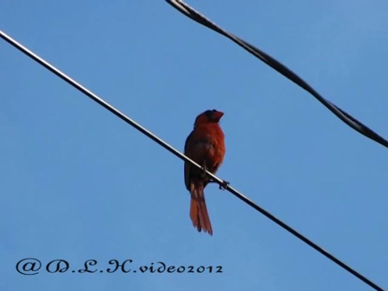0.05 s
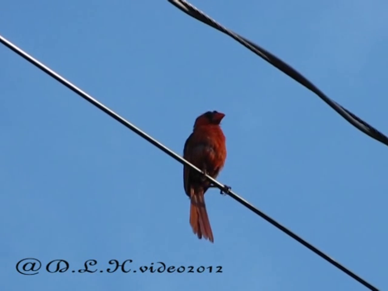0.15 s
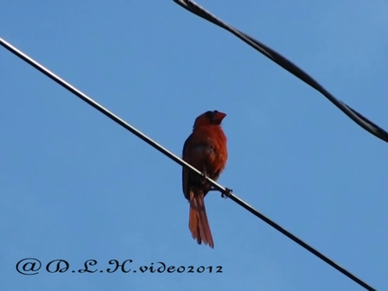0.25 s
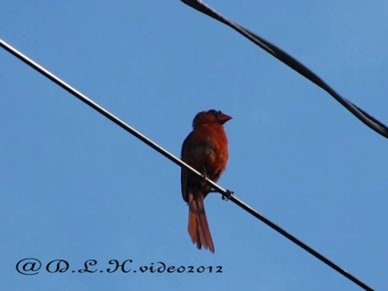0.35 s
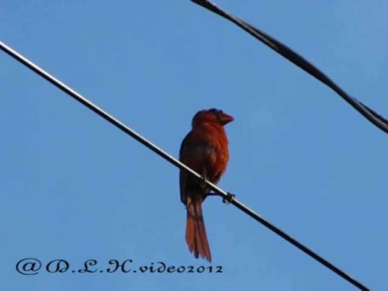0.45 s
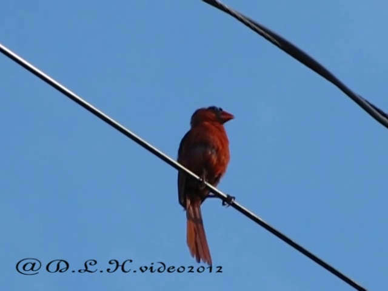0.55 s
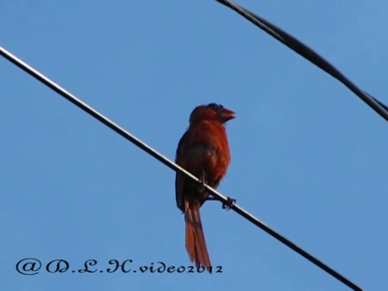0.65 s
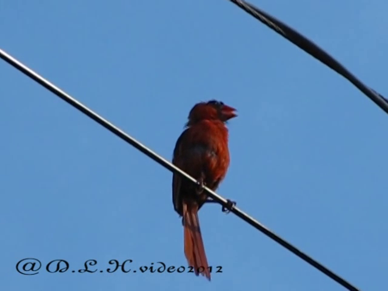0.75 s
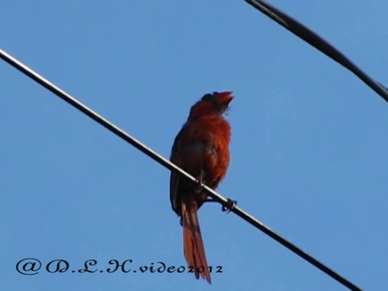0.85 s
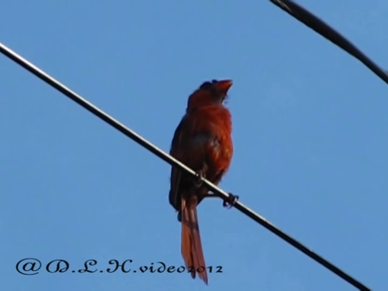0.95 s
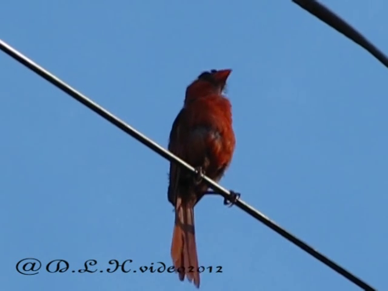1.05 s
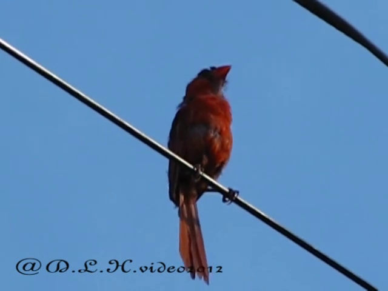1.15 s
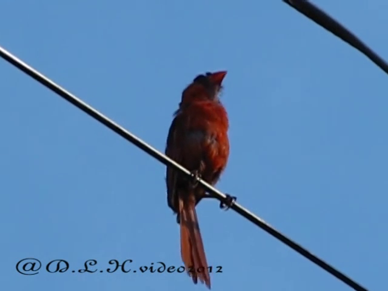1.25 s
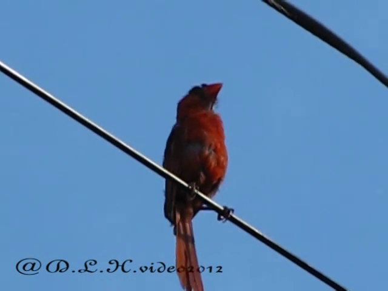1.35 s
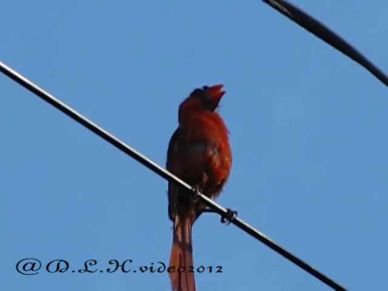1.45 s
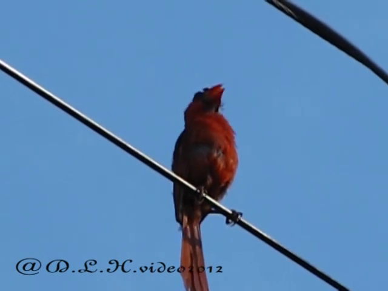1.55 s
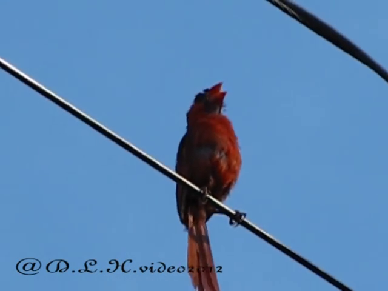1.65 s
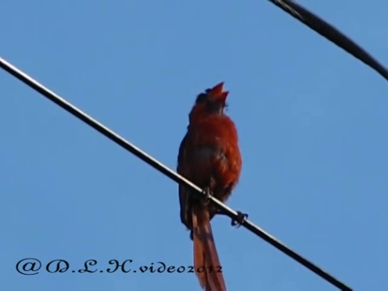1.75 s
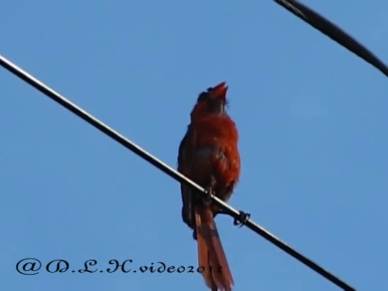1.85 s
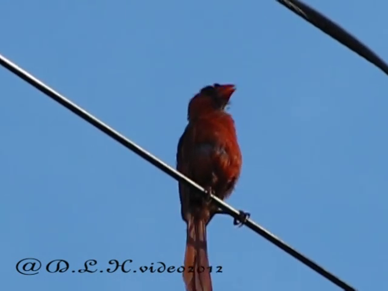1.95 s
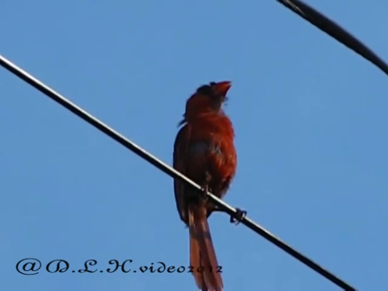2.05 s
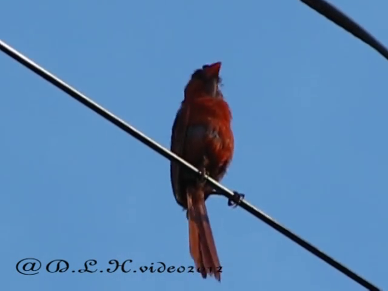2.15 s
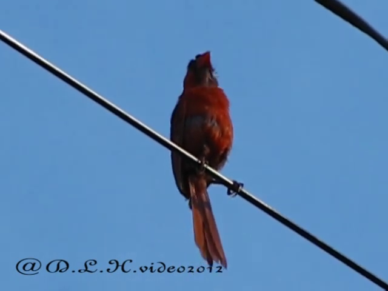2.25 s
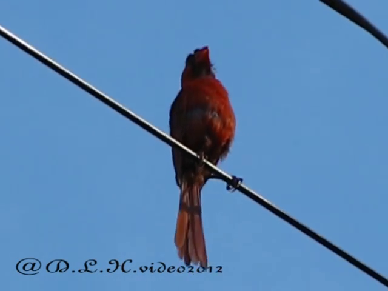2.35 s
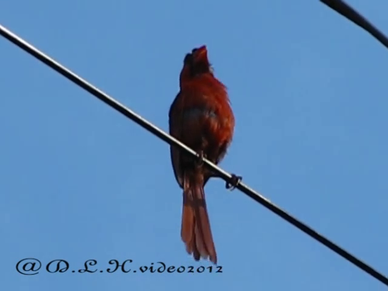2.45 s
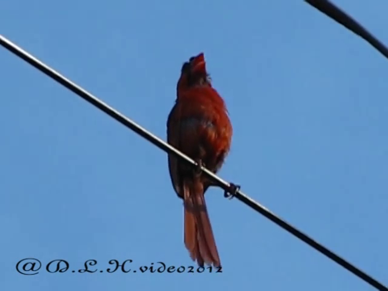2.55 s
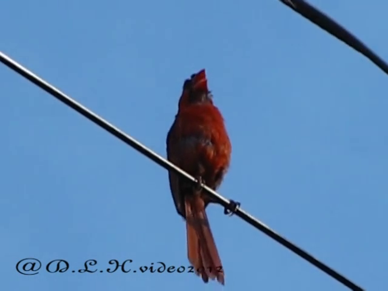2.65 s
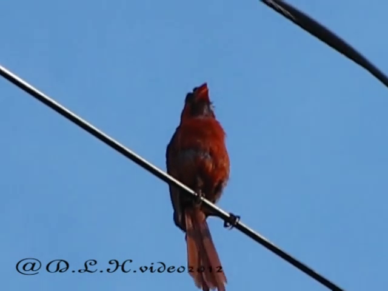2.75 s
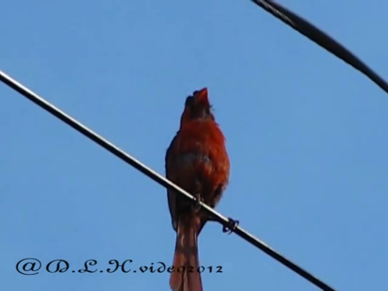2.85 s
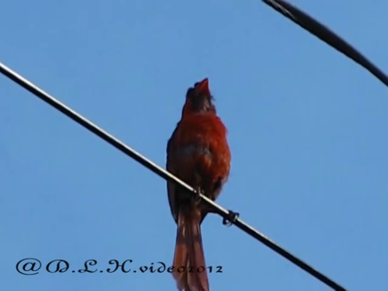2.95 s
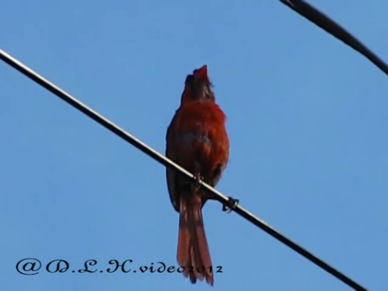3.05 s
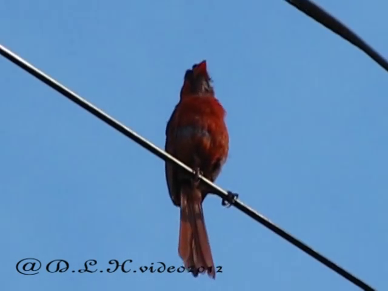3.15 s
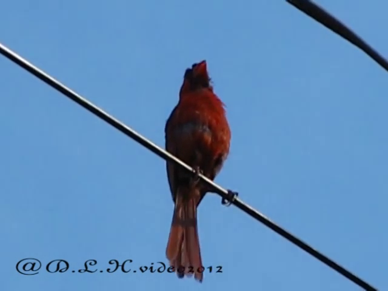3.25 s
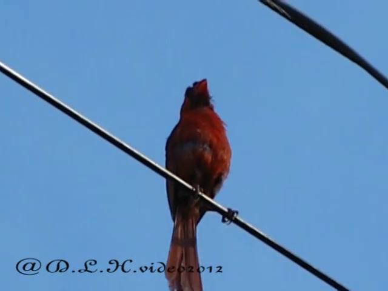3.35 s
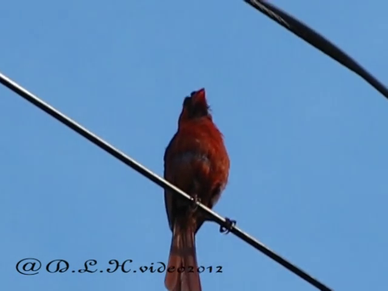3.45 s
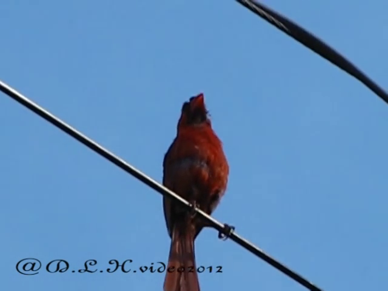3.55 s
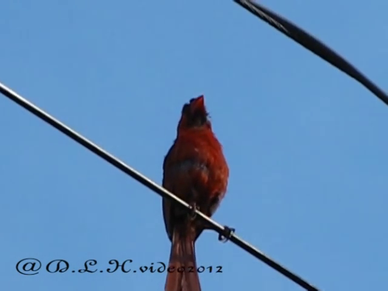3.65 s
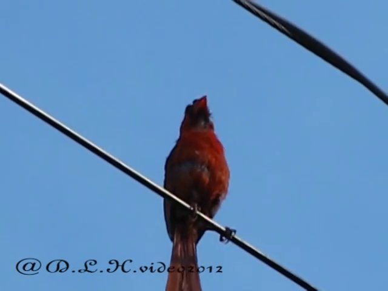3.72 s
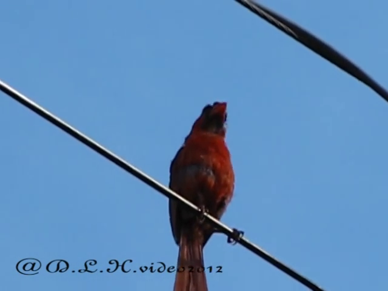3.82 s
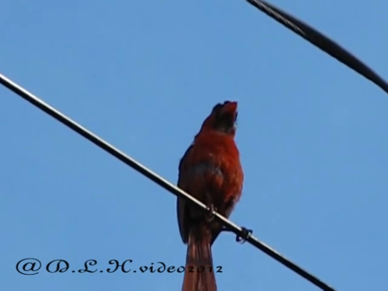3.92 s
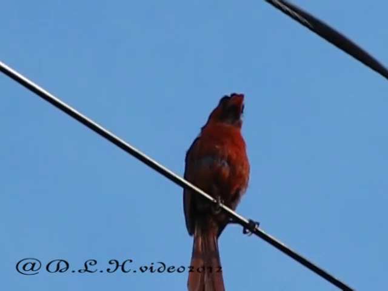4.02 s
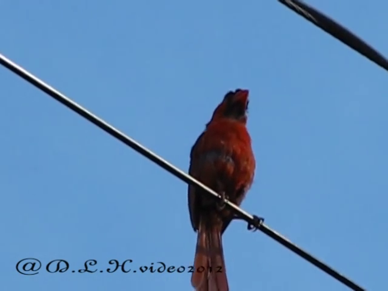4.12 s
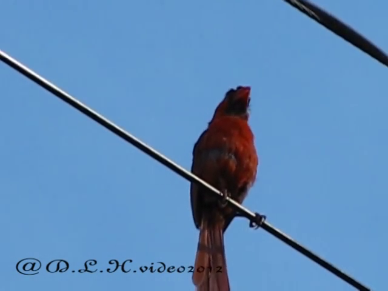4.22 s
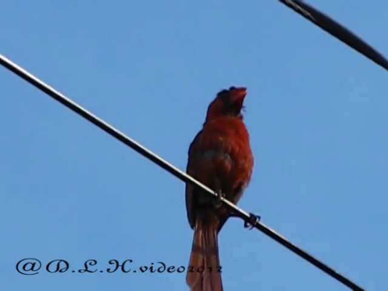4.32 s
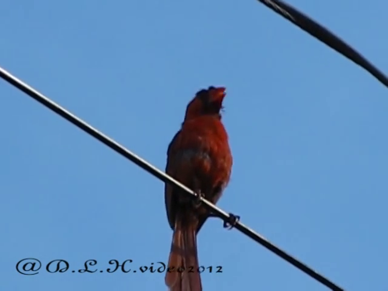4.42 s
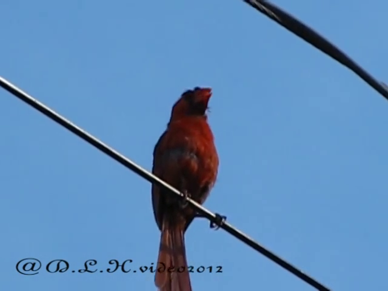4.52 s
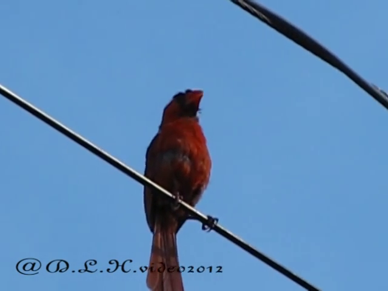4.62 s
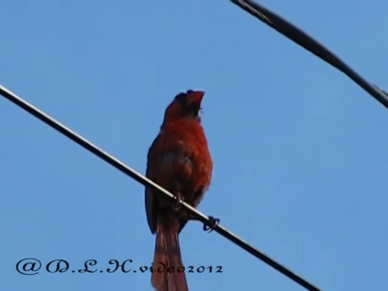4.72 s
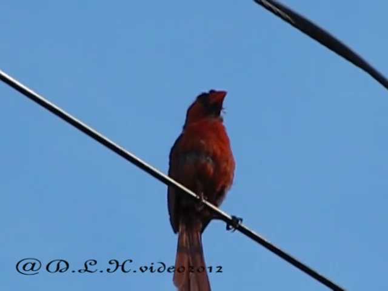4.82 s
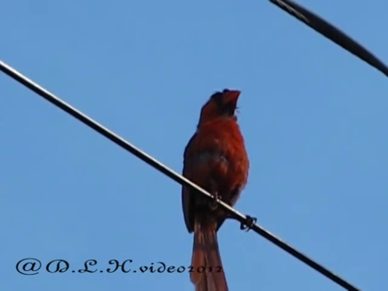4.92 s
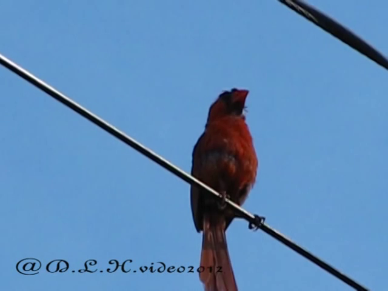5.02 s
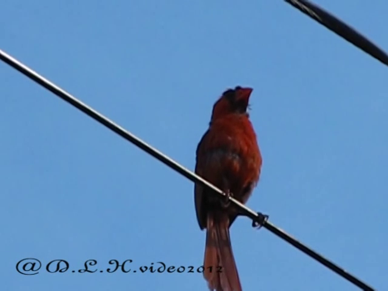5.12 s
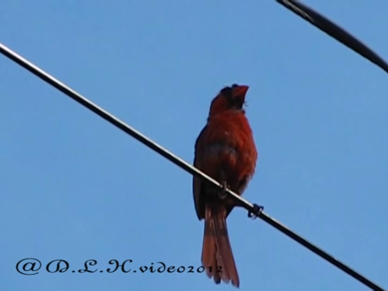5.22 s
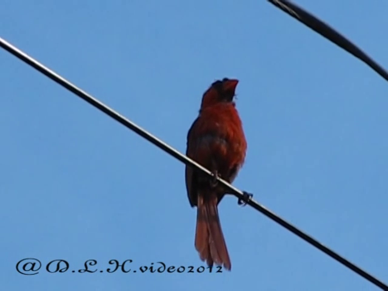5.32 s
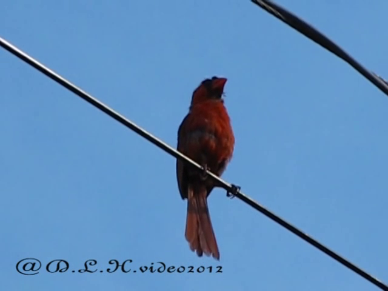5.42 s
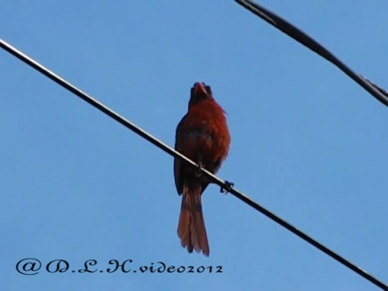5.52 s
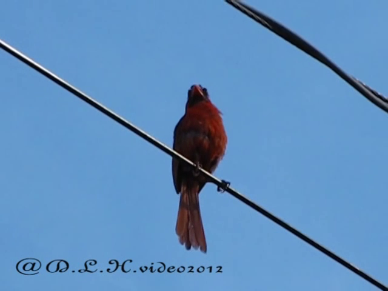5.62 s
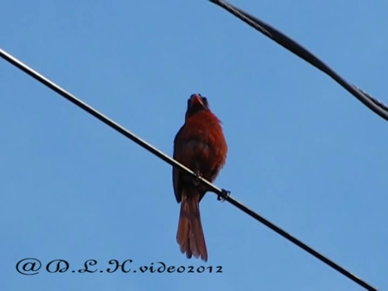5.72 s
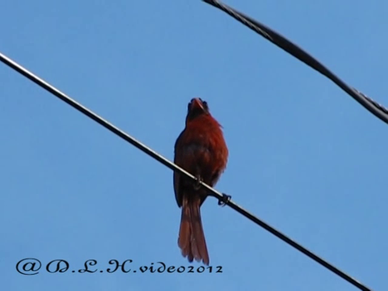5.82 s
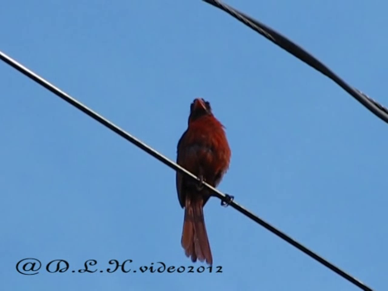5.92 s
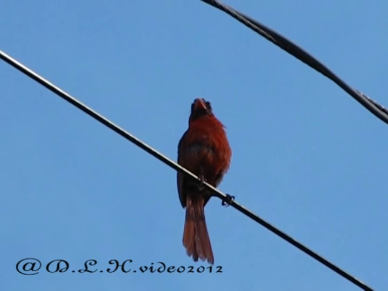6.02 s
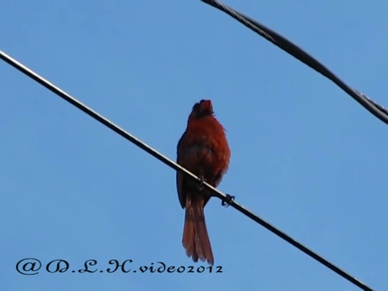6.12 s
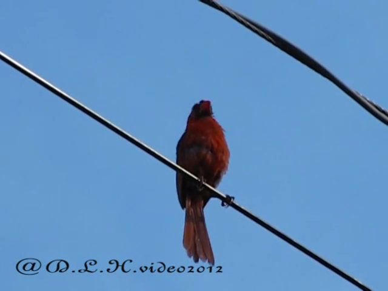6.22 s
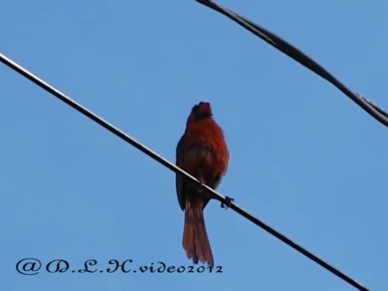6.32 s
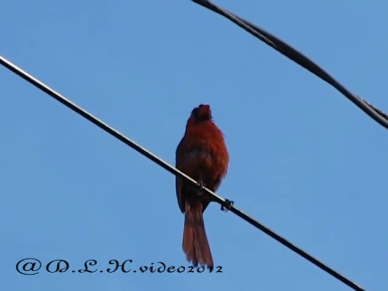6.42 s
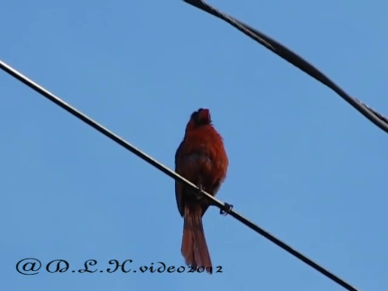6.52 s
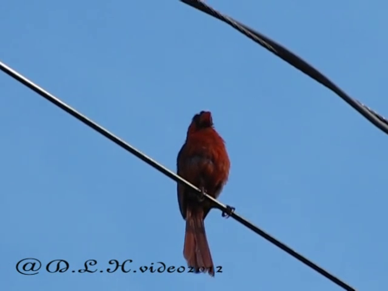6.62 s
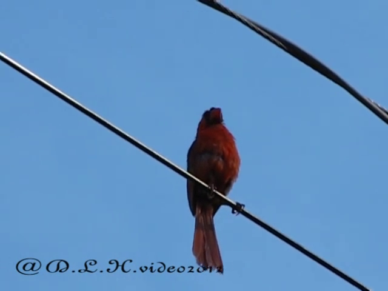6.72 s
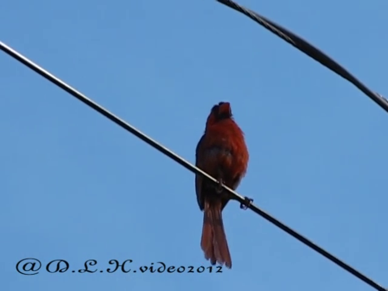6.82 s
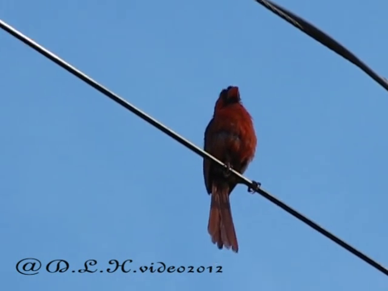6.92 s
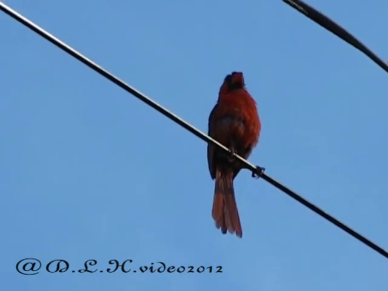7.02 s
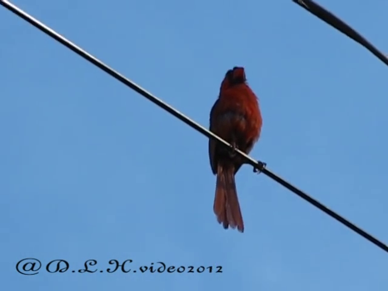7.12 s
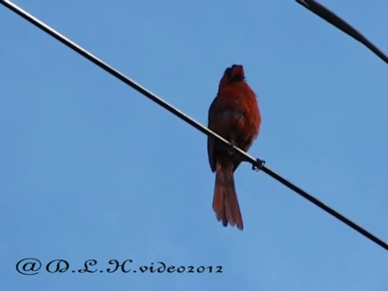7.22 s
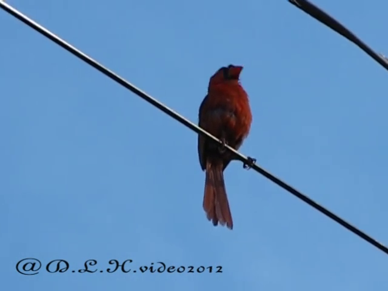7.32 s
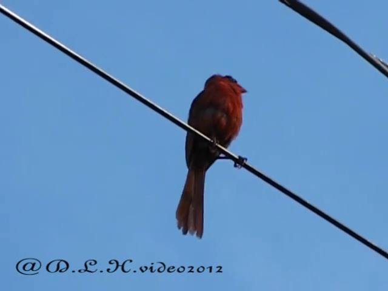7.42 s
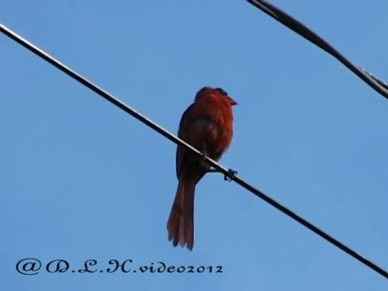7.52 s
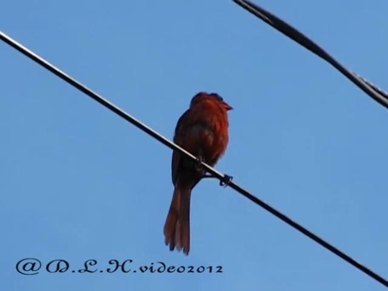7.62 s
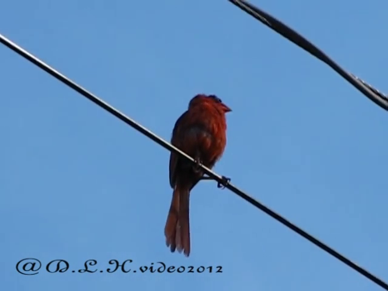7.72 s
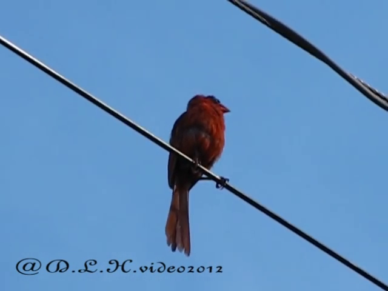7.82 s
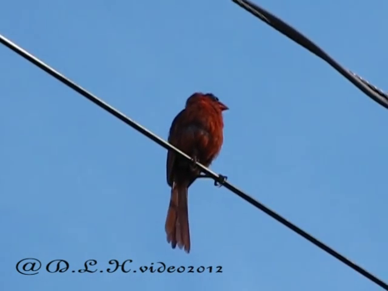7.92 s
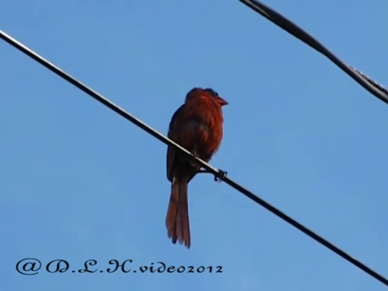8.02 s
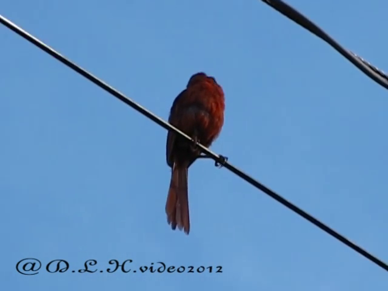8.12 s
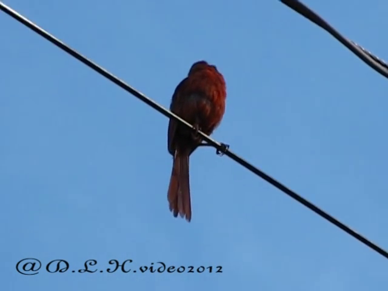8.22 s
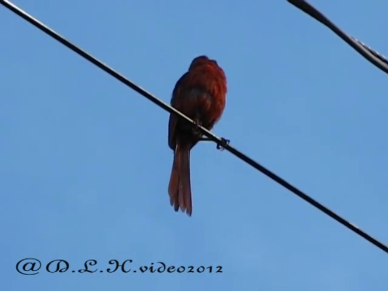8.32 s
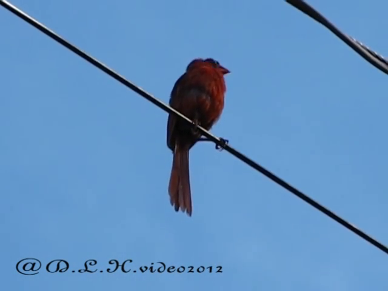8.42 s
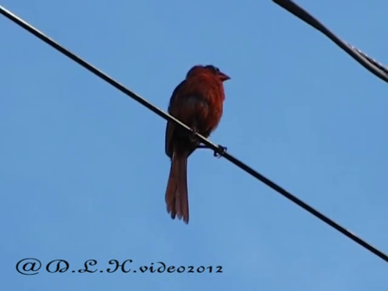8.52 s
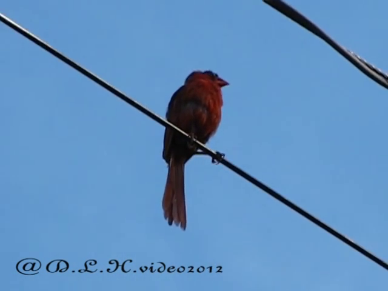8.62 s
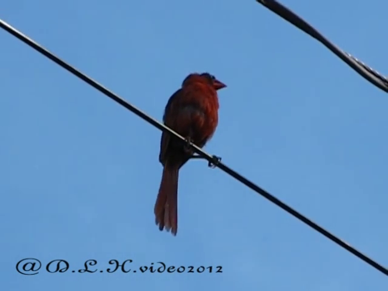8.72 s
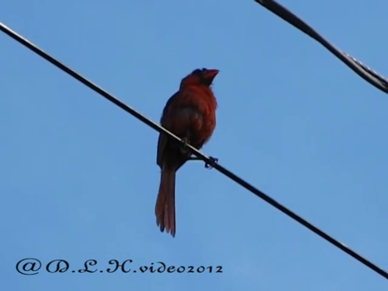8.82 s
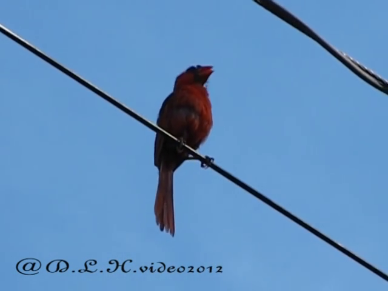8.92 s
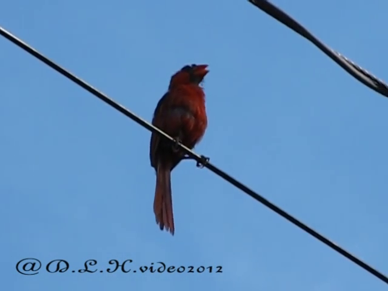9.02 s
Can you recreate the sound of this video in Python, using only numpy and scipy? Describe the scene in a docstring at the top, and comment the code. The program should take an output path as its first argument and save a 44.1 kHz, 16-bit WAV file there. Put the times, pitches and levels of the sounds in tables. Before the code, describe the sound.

Outdoors, a red songbird sings piercing downward whistles, then a quick trill, over throbbing insects, distant birds and a few bumps on the microphone.

```python
"""From the outset two insects throb near 6-7 kHz over distant traffic, crickets chirp and far birds whistle.
From 0.5 s a songbird whistles steep slurs, high then low, in three pairs; from 3.3 s it trills, and near
8.8 s one high slur returns. Knocks on a hand-held camera come near 0.5, 3.5, 5.4 and 8 s. Voices are swept
sines, insects noise ringing in resonances, knocks damped modes and traffic shaped noise. Trees and houses
return decaying echoes, and two microphone ports hear sources with differing phase and level."""
import sys
import numpy as np
from scipy import signal
from scipy.fft import rfft, irfft
from scipy.io import wavfile
from scipy.ndimage import uniform_filter1d

SR = 44100
rng = np.random.default_rng(int(sys.argv[2]) if len(sys.argv) > 2 else 0)


def store_pcm(level_fs):
    """Save levels as 16-bit WAV."""
    pcm = np.round(np.clip(level_fs, -1, 1) * 32767).astype(np.int16)
    wavfile.write(sys.argv[1], SR, np.atleast_2d(pcm).T)


N = 399546  # length [samples]
T = np.arange(N) / SR  # time [s]
HZ = np.maximum(np.fft.rfftfreq(N, 1 / SR), 1)  # frequency of each spectral bin [Hz]
TOP_HZ = 15600  # upper limit of the overtones and of the recorder

# High slurs: (start [s], length [s], level [dB], extra opening level [dB],
# opening pitch [factor], mid-fall pitch [factor])
HIGH_SLURS = [(0.498, .48, -22, -15, .92, 1.035), (1.503, 0.43, -19.5, 1.5, 0.93, 1.004),
              (2.427, 0.43, -21.5, 1.5, 1.027, .995), (8.782, 0.45, -20, -15.5, 1.03, 1.046)]
# Their common contour: (share of the length [1], pitch [Hz], level [dB]); a faint tone trails after share 1
HIGH_CONTOUR = [(0, 8860, -10), (.012, 7900, -7.5), (.04, 6796, 4), (.083, 5710, 9.5), (.138, 5090, -2.5),
                (.207, 4683, -3), (.29, 4100, -2.5), (.38, 3820, -2), (0.483, 3420, 1), (.595, 3145, 3),
                (.72, 2816, 1.5), (0.857, 2453, 3), (1.001, 2316, -2.5), (1.01, 2264, -32),
                (1.22, 2400, -57)]
OPENING_DB_SHARE, OPENING_PITCH_SHARE = 0.49, 0.093  # reach of the opening changes [share of the length]
# Low slurs: (start [s], length [s], first pitch [Hz], last pitch [Hz], level [dB],
# level change over the slur [dB])
LOW_SLURS = [(1.099, 0.26, 2090, 1713, -32.5, 6), (2.034, 0.27, 2112, 1588, -29, -2.5),
             (2.955, .282, 2072, 1560, -28.5, -7)]
# Their common contour: (share of the length [1], share of the fall in pitch [1], level [dB])
LOW_CONTOUR = [(0, 0.088, -15), (0.041, 0.01, 1.5), (.25, .22, 2), (.5, .58, -1.5), (.7, .78, -3),
               (.9, 0.91, -2), (1.0, 0.68, -33)]
# Trill note, a hook up and a plunge: (time from the plunge [s], pitch [Hz], level [dB])
TRILL_CONTOUR = [(-.013, 5830, -13), (-.007, 7125, -7), (-.004, 7050, -11), (-.001, 5780, -3),
                 (.001, 3800, -1), (.004, 2530, -2), (.007, 2046, -14.5), (.014, 1793, -7),
                 (.029, 1330, -18), (.033, 1300, -16)]
# Trill notes: (time of the plunge [s], level [dB], hook pitch [factor])
TRILL_NOTES = [(3.3235, -25, 0.97), (3.424, -27, 1.0), (3.5256, -22, 0.99), (3.63, -24, 0.97),
               (3.7356, -23.5, 1.01), (3.841, -22.5, 1.04), (3.9455, -21.5, 0.96), (4.0501, -22, 0.98),
               (4.1568, -23, 0.99), (4.2622, -22.5, 1), (4.367, -21, 1.04), (4.476, -21.5, 1.01),
               (4.581, -21, 1.04), (4.6907, -22.5, 0.98)]
# Overtones: (multiple of the pitch [1], level in high slurs [dB], in low slurs [dB], in the trill [dB])
VOICE_OVERTONES = [(2, -25.5, -27, -18.5), (3, -31.5, -46, -38), (4, -30.5, -13.5, -33),
                   (5, -30.5, -29, -45), (6, -48, -23.5, -30), (7, -52, -38, -31), (8, -52, -38, -46)]
# Throat and beak resonance acting on the overtones: (frequency [Hz], gain [dB])
BEAK_GAIN = [(2000, 21.5), (6500, -16), (7600, 4.5), (9000, 0), (12000, -4), (14000, -14), (16000, -24)]
# Songbird at the two ports: (frequency [Hz], left minus right level [dB], phase lead of the left [rad])
BIRD_AT_PORTS = [(300, -6, 6), (1840, 0, 1.3), (2800, -3, -1.4), (3800, 5, 1.47), (4500, 4, -2),
                 (5000, 7.5, -2.5), (6230, -6, -5), (7180, -2, -5), (7900, 10.5, -8.5), (8470, -1, -8.5),
                 (10500, 4.5, -8.5), (11800, 0, -10.5)]
# Echo of trees and houses: (frequency [Hz], level [dB], time to decay by 60 dB [s])
ECHO_BANDS = [(1450, -3.5, 0.52), (2400, -5.5, 0.65), (3100, 1, 0.52), (4500, -5, 0.53), (6100, -7.5, 0.25),
              (10300, -5.5, 0.31)]

# Camera knocks: (time [s], level [dB], ring [Hz], time to decay by 60 dB [s],
# left minus right level [dB], click level [dB])
KNOCK_EVENTS = [(.434, -27.5, 373, 0.011, 14, 3), (0.477, -36, 1674, .05, -6, -4),
                (0.622, -26, 1130, 0.033, 7, 15), (3.369, -12, 743, 0.013, -8, 6.5),
                (3.408, -19, 706, 0.015, -7, 0), (3.478, -16.5, 705, 0.01, -6, -12),
                (3.619, -17, 743, 0.014, -6.5, -1), (5.433, -22, 694, 0.017, 7, 3.5),
                (5.472, -33.5, 357, .015, 17, 7), (7.929, -37, 2200, .01, -3, 3),
                (8.099, -31, 2650, .012, 4, 0), (8.229, -39, 2400, .01, -1.0, 9)]
# Modes of the camera housing: (multiple of the ring frequency [1], level [dB])
HOUSING_MODES = [(1.0, -2), (.72, -22), (1.4, -7.5)]

# Near cricket, a lead-in and two strong pulses: (time of the first pulse [s], time to the second [s],
# time since the lead-in [s], pulse level [dB], lead-in level [dB])
NEAR_CHIRPS = [(0.2562, 0.08, .077, -29, -48), (0.8175, 0.083, .07, -28, -55),
               (1.48, 0.074, .076, -28, -46), (2.1273, 0.082, 0.048, -27.5, -44),
               (2.6903, 0.082, .07, -28, -55), (5.3038, 0.087, 0.082, -29.5, -52),
               (7.013, .0818, 0.077, -30, -47), (8.3825, 0.086, 0.054, -29.5, -45)]
# Far cricket: (time [s], level [dB])
FAR_CHIRPS = [(1.0335, -48), (2.308, -51), (2.3946, -46.5), (3.2735, -45.5), (3.3701, -45), (3.904, -45),
              (4.0023, -44), (4.6224, -45), (5.5438, -51), (6.3704, -47.5), (6.4862, -46.5), (7.1736, -49),
              (7.2599, -46), (8.2227, -46.5)]
# Pulse kinds: (pitch [Hz], left minus right level [dB], nominal length [s])
NEAR_PULSE_KIND = (4100, 6.5, 0.032)
LEAD_IN_KIND = (3960, -2.5, .028)
FAR_PULSE_KIND = (4190, 13, 0.025)

# Throbbing of the lower and higher insect: (time [s], throbs counted so far [cycles], level [dB])
LOW_THROBS = [(0.0, -0.2, -47), (1.2, 20.8, -46.5), (2.1, 36.39, -46), (2.4, 41.87, -45.5),
              (2.7, 47.8, -44.5), (3.0, 53.31, -45.5), (3.3, 58.16, -45.5), (4.8, 86.39, -45),
              (5.4, 96.74, -45), (6.5, 117.4, -45), (6.65, 120.3, -48), (6.9, 124.86, -48.5),
              (7.2, 130.3, -49), (8.4, 154.2, -48.7), (8.7, 159.66, -48.5), (9.06, 166.8, -49)]
HIGH_THROBS = [(0.0, 0.28, -75), (0.3, 7.9, -64), (0.9, 22.73, -55), (2.1, 52.6, -49.5), (3.3, 82.5, -49),
               (3.9, 97.15, -49), (4.2, 103.87, -61), (4.8, 118.41, -59), (5.7, 137.76, -63),
               (6.0, 144.3, -56), (6.3, 150.77, -56), (7.5, 180.22, -52.5), (8.7, 210.07, -49),
               (9.06, 218.82, -48)]
# Their body resonances: (frequency [Hz], width [Hz], level [dB], lag in the throb [cycles],
# extra level per dB of throb level above its median [dB/dB])
LOW_BODY = [(6300, 81, -3, 0.0, 0.5), (6080, 160, -6.5, 0.24, 1.5), (5670, 95, -10.5, 0.24, 1),
            (6510, 12, -11.5, 0.0, -2.3), (12600, 490, -29.5, 0.0, 0.5)]
HIGH_BODY = [(6845, 63, -2.5, -0.036, 0.014), (7030, 56, -14, -0.054, 0.0)]

# Far whistles: (start [s], end [s], first pitch [Hz], last pitch [Hz], level [dB],
# left minus right level [dB])
FAR_WHISTLES = [(0.014, 0.227, 2830, 2920, -57, 4), (.66, 0.784, 3185, 3150, -48, 1.5),
                (1.05, 1.401, 3420, 2990, -55, 6), (2.8, 2.948, 4500, 4410, -46, 6),
                (4.07, 4.143, 3316, 3260, -51, 11), (4.185, 4.248, 3206, 3170, -42, 6),
                (4.28, 4.393, 3120, 3065, -45, 0.5), (4.40, 4.553, 3010, 2850, -52.5, 9),
                (5.08, 5.29, 4420, 4500, -61, 11), (5.92, 6.15, 4410, 4460, -65, 17),
                (5.994, 6.087, 3054, 2140, -42.5, 5), (6.075, 6.1, 2190, 2150, -45, -10),
                (6.85, 6.974, 3254, 3210, -51, 7), (6.97, 7.087, 3230, 3100, -42.5, 0),
                (7.084, 7.146, 3047, 2800, -41, 1.5), (7.122, 7.332, 3056, 2930, -51.5, -1),
                (7.212, 7.302, 3530, 3630, -54, 3), (5.955, 6.033, 3760, 3880, -61, 8),
                (7.601, 7.843, 3274, 2933, -49.5, 3), (7.91, 7.937, 4410, 4370, -58, 9),
                (7.987, 8.035, 4380, 4470, -52, 9)]
# Parts of a far bird's rough call: (time after its start [s], length [s], first pitch [Hz],
# last pitch [Hz], left minus right level [dB], extra initial pitch scatter [Hz])
ROUGH_CALL_PARTS = [(0.0, .09, 4650, 4500, 9, 350), (.015, .13, 3360, 3290, 5, 260),
                    (.06, .09, 2790, 2730, 4, 60)]
# Rough calls: (start [s], level of the first part [dB], of the second [dB], of the third [dB])
ROUGH_CALLS = [(.542, -70, -49, -70), (4.92, -57, -52, -60), (5.53, -54, -49, -55), (6.84, -57, -65, -70),
               (7.276, -60, -62, -70), (7.72, -55, -51, -65), (8.642, -56, -53, -52)]
WHISTLE_SCATTER_HZ = 25.7  # pitch scatter in every far note
SETTLE_SHARE = .3  # decay constant of the extra scatter [share of the length]

# Spectrum of distant traffic and air: (frequency [Hz], relative level [dB per Hz])
TOWN_SPECTRUM = [(12, -26), (22, -3.5), (60, 1.5), (120, -0.5), (190, -4.5), (440, -13), (900, -14.5),
                 (1300, -19), (2200, -22.5), (3000, -21), (4300, -22.5), (5200, -29), (7300, -26.5),
                 (8000, -35), (10000, -40.5), (13200, -45.5), (15600, -54)]
# Likeness of that noise at the two ports: (frequency [Hz], likeness [1])
TOWN_LIKENESS = [(60, 0.91), (300, 0.95), (700, 0.8), (1400, 0.61), (2400, 0.38), (5000, 0.052)]
TOWN_DB, TOWN_LAG_S = -38.5, .00005  # rms level before panning; delay of the left port


def undb(db):
    """Decibel law: the amplitude gain of a level [dB]."""
    return 10 ** (np.asarray(db) / 20)


def across(table, hz=HZ):
    """Logarithmic frequency scale: table columns interpolated along it."""
    f, *columns = np.transpose(table)
    return [np.interp(np.log(hz), np.log(f), c) for c in columns]


def unit(x):
    """Normalization: the signal scaled to rms 1."""
    return x / np.sqrt(np.mean(x ** 2))


def band(x, hz, width_hz):
    """Resonance: a Gaussian band-pass response."""
    return irfft(rfft(x) * np.exp(-.5 * ((HZ - hz) / width_hz) ** 2), N)


def walk(rate, size=N):
    """Slow fluctuation: random levels held 1 / rate s and smoothed twice; spread near 1."""
    k = int(SR / rate)
    held = np.repeat(rng.standard_normal(size // k + 1), k)
    return 1.92 * uniform_filter1d(uniform_filter1d(held, k), k)[:size]


def pan(db):
    """Level difference between the ports: left and right gains."""
    return undb(np.array([db / 2, -db / 2]))


def songbird(scoop_s=0.0074, scoop=.72, flicker_db=3.5):
    """Frequency glide: slurs and trill in one voice; each low slur scoops up into its first pitch."""
    out = np.zeros(N)
    flicker = flicker_db * walk(200)
    notes = []
    for at, length, db, opening_db, opening, middle in HIGH_SLURS:
        rows = []
        for u, hz, rel in HIGH_CONTOUR:
            bend = opening ** np.exp(-u / OPENING_PITCH_SHARE) * middle ** np.sin(np.pi * min(u, 1))
            extra_db = opening_db * np.exp(-(u / OPENING_DB_SHARE) ** 2)
            rows.append((at + u * length, hz * bend, db + rel + extra_db))
        notes.append((rows, 1, -1.5))
    for at, length, first_hz, last_hz, db, change_db in LOW_SLURS:
        rows = [(at + u * length, first_hz + fall * (last_hz - first_hz), db + rel + u * change_db)
                for u, fall, rel in LOW_CONTOUR]
        scoop_row = (at - scoop_s, first_hz * scoop, rows[0][2] - 4)
        notes.append(([scoop_row] + rows, 2, 1.5))
    for at, db, hook in TRILL_NOTES:
        rows = [(at + s, hz * (hook if s < 0 else 1), db + rel) for s, hz, rel in TRILL_CONTOUR]
        notes.append((rows, 3, -5.5))
    for rows, overtone_column, trim_db in notes:
        span, tone = whistle(rows, overtone_column, flicker)
        out[span] += undb(trim_db) * tone
    return out


def whistle(rows, overtone_column, flicker, fade_s=0.00077):
    """Harmonic series: a near sine on the pitch curve with weak overtones and random level flicker,
    shifted for each overtone; returns the span and sound of one note."""
    s, hz, db = np.transpose(rows)
    span = slice(int(s[0] * SR), min(int(s[-1] * SR), N))
    t = T[span]
    log_hz = np.interp(t, s, np.log(hz))
    hz = np.exp(uniform_filter1d(log_hz, len(t) // 60, mode="nearest"))
    phase = 2 * np.pi * np.cumsum(hz) / SR
    tone = np.sin(phase) * undb(.35 * flicker[span])
    for k, row in enumerate(VOICE_OVERTONES):
        overtone_hz = row[0] * hz
        shifted_flicker = np.roll(flicker, 900 * k)[span]  # shifted in samples
        overtone_db = row[overtone_column] + across(BEAK_GAIN, overtone_hz)[0] + shifted_flicker
        tone += undb(overtone_db) * np.sin(row[0] * phase) * (overtone_hz < TOP_HZ)
    fade = np.clip(np.minimum(t - s[0], min(s[-1], T[-1]) - t) / fade_s, 0, 1)
    return span, np.sqrt(2) * undb(np.interp(t, s, db)) * fade * tone


def ports(x):
    """Diffraction: the camera body shades and delays the bird differently at each port."""
    db, lead = across(BIRD_AT_PORTS)
    spectrum = rfft(x)
    return np.array([irfft(spectrum * undb(side * db / 2) * np.exp(side * .5j * lead), N)
                     for side in (1, -1)])


def echoes(x, onset_s=0.002, shared=0.033):
    """Reverberation: clumped scattered returns decay band by band, slightly alike at both ports."""
    t, hz = T[:SR], np.maximum(np.arange(SR // 2 + 1), 1)
    noise = rng.standard_normal((3, SR)) * undb(0.51 * walk(400, size=SR))
    noise = np.sqrt(shared) * noise[0] + np.sqrt(1 - shared) * noise[1:]
    centres = [row[0] for row in ECHO_BANDS]
    tail = 0
    for k, (_, db, t60) in enumerate(ECHO_BANDS):
        share = np.interp(np.log(hz), np.log(centres), np.arange(len(centres)) == k)
        decay = np.exp(-np.log(1000) * t / t60) * (t > onset_s)
        decay = decay / np.sqrt(np.sum(decay ** 2))  # unit energy
        tail = tail + undb(db) * share * rfft(noise * decay)
    return signal.fftconvolve(x, irfft(tail, SR), axes=1)[:, :N]


def knocks(dull_hz=3800., click_s=0.00011):
    """Impact excitation: a dry click and a short ring of housing modes, dulled by the plastic."""
    out, t = np.zeros((2, N)), T[:SR // 16]
    grain = rng.standard_normal((len(KNOCK_EVENTS), len(t)))
    for (at, db, hz, t60, pan_db, click_db), noise in zip(KNOCK_EVENTS, grain):
        modes = sum(undb(rel) * np.sin(2 * np.pi * k * hz * t) for k, rel in HOUSING_MODES)
        ring = -modes * np.exp(-np.log(1000) * t / t60)
        u = t / click_s
        click = -3 * (u - u ** 2 / 2) * np.exp(-u) + 0.24 * noise * np.exp(-t / 0.00062)
        start = int((at + 0.00174) * SR)  # 1.74 ms after the tabled time
        out[:, start:start + len(t)] += undb(db) * pan(pan_db)[:, None] * (ring + undb(click_db) * click)
    return signal.sosfilt(signal.butter(2, dull_hz, fs=SR, output="sos"), out)


def crickets(skew=1.09, droop=0.045, after_db=-12, faint_db=-37, faint_length=2.1):
    """Amplitude envelope: drooping tones swell and stop, then a weaker pulse; faint ones are longer, flatter."""
    out = np.zeros((2, N))
    chirps = [(at, db, *FAR_PULSE_KIND) for at, db in FAR_CHIRPS]
    for at, gap, lead, db, lead_db in NEAR_CHIRPS:
        chirps.append((at - lead, lead_db, *LEAD_IN_KIND))
        chirps += [(at, db, *NEAR_PULSE_KIND), (at + gap, db, *NEAR_PULSE_KIND)]
    for at, db, hz, pan_db, length in chirps:
        bend = droop
        if db < faint_db:
            length, bend = length * faint_length, droop / 4
        u = np.arange(int(length * SR)) / (length * SR)
        phase = 2 * np.pi * np.cumsum(hz * (1 + bend * (.4 - u ** 2))) / SR
        chirp = np.sin(np.pi * u ** skew) * np.sin(phase)
        chirp = np.r_[chirp, undb(after_db) * chirp[len(u) // 3:]]
        start = int((at - .009) * SR)  # 9 ms before the tabled time
        out[:, start:start + len(chirp)] += undb(db) * pan(pan_db)[:, None] * chirp
    return out


def insect(rows, body, depth_db, sharp, shared, pan_db, even):
    """Forced resonance: clicks ring a throbbing body, partly out of phase at the ports; even steadies it."""
    s, count, db = np.transpose(rows)
    cycle, db = np.interp(T, s, count), np.interp(T, s, db)
    out = 0
    for hz, width_hz, rel_db, lag, follow in body:
        clicks = rng.standard_normal((2, N)) * undb(2.8 * rng.standard_normal((2, N)))
        one, other = (unit(band(c, hz, width_hz)) for c in clicks)
        # dividing by a power of the envelope evens out the ringing
        one, other = (unit(v / abs(signal.hilbert(v)) ** even) for v in (one, other))
        quadrature = np.imag(signal.hilbert(one))
        other = even * quadrature + np.sqrt(1 - even ** 2) * other
        both = np.array([one, -shared * one + np.sqrt(1 - shared ** 2) * other])
        throb = (.5 + .5 * np.cos(2 * np.pi * (cycle - lag))) ** sharp
        follow_db = follow * (db - np.median(db))
        out = out + both * undb(rel_db + follow_db + depth_db * (throb - .5) + 0.93 * walk(11))
    return out * undb(db) * pan(pan_db)[:, None]


def far_birds(waver_db=2.5):
    """Frequency and amplitude modulation: pitch and level waver on the way through the leaves."""
    out, wobble, waver = np.zeros((2, N)), walk(600), waver_db * walk(45)
    phrases = [(*row, 0) for row in FAR_WHISTLES]
    for at, *levels in ROUGH_CALLS:
        for db, (late, length, first_hz, last_hz, pan_db, scatter_hz) in zip(levels, ROUGH_CALL_PARTS):
            start = at + late
            phrases.append((start, start + length, first_hz, last_hz, db, pan_db, scatter_hz))
    for start, end, first_hz, last_hz, db, pan_db, scatter_hz in phrases:
        span = slice(int(start * SR), int(end * SR))
        u = np.clip((T[span] - start) / (end - start), 0, 1)
        scatter = WHISTLE_SCATTER_HZ + scatter_hz * np.exp(-u / SETTLE_SHARE)
        hz = first_hz + (last_hz - first_hz) * u + scatter * wobble[span]
        swell = np.abs(np.sin(np.pi * u)) ** 0.12 * undb(db + waver[span])
        out[:, span] += pan(pan_db)[:, None] * swell * np.sin(2 * np.pi * np.cumsum(hz) / SR)
    return out


def town():
    """Spatial coherence: octaves of traffic and air noise swell a little, the bass most alike at both ports."""
    alike = across(TOWN_LIKENESS)[0]
    mid, side = (rfft(v) * undb(across(TOWN_SPECTRUM)[0]) for v in rng.standard_normal((2, N)))
    mid, side = mid * np.sqrt(1 + alike), side * np.sqrt(1 - alike)
    both = np.array([(mid + side) * np.exp(-2j * np.pi * HZ * TOWN_LAG_S), mid - side])
    out, swell = 0, walk(0.61)
    for octave in range(5, 15):  # centred on 2 ** octave Hz
        share = np.clip(1 - abs(np.clip(np.log2(HZ), 5, 14) - octave), 0, 1)
        out = out + irfft(both * share, N) * undb(.5 * swell + .8 * walk(5))
    return undb(TOWN_DB) * unit(out) * pan(0.09)[:, None]


def scene():
    """Superposition: direct sounds and echoes add; far birds feed the echoes most, crickets least."""
    bird, far, chirps = ports(songbird()), far_birds(), crickets()
    low_buzz = insect(LOW_THROBS, LOW_BODY, depth_db=10.5, sharp=1.0, shared=.35, pan_db=1.5, even=.55)
    high_buzz = insect(HIGH_THROBS, HIGH_BODY, depth_db=15.0, sharp=1.1, shared=.25, pan_db=1.5, even=.9)
    wet = echoes(bird + undb(3.0) * far + undb(-3.5) * chirps)
    return bird + far + chirps + wet + low_buzz + high_buzz + knocks() + town()


def record(dry):
    """Band limitation: the recorder cuts the top with a steep elliptic low-pass."""
    return signal.sosfilt(signal.ellip(10, .2, 80, TOP_HZ, fs=SR, output="sos"), dry)


dry = scene()
out = record(dry)
store_pcm(out)
```